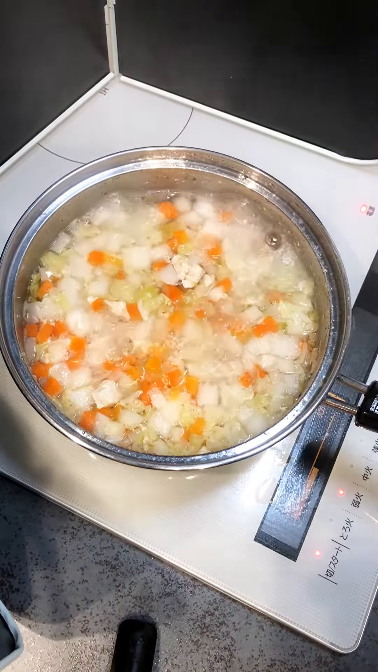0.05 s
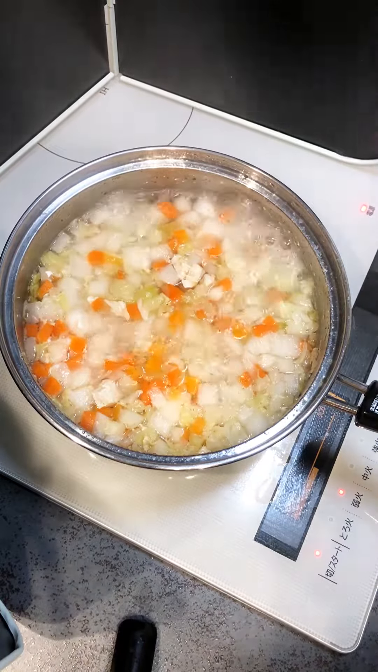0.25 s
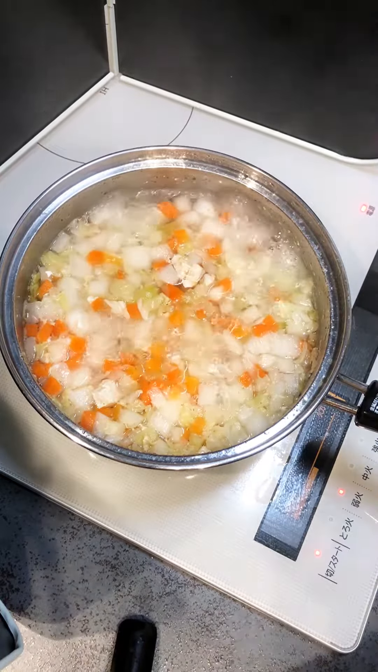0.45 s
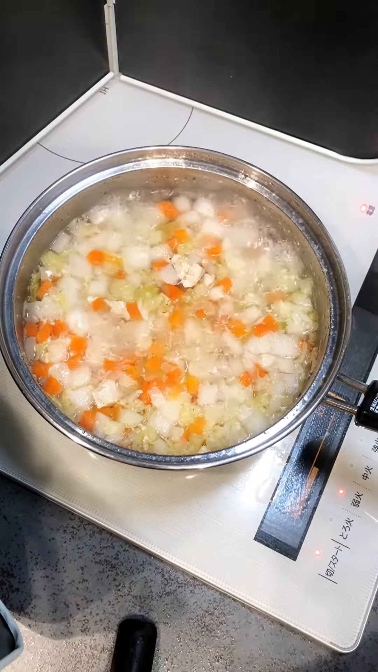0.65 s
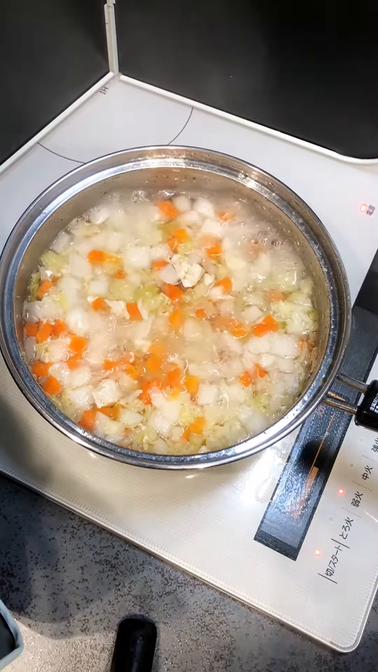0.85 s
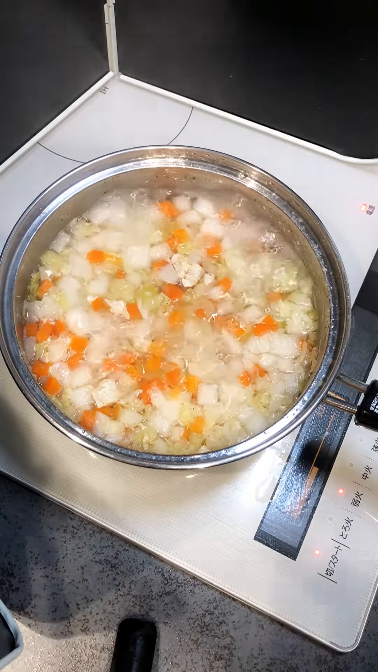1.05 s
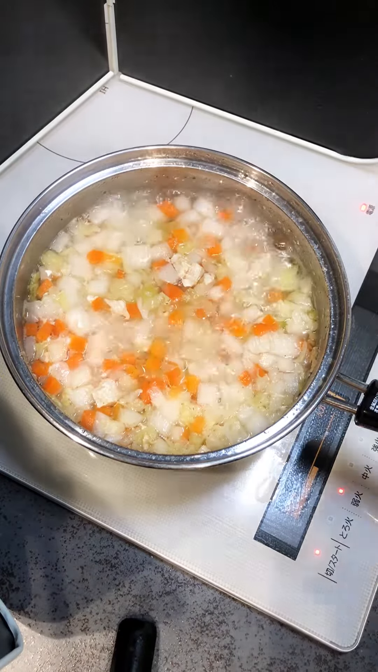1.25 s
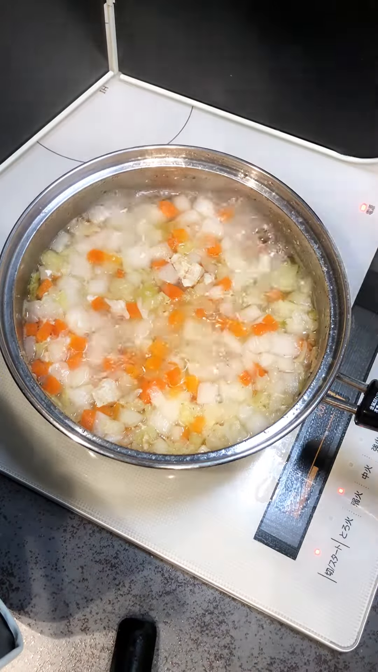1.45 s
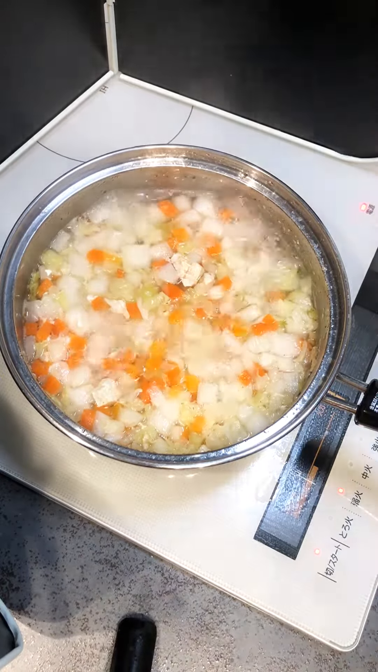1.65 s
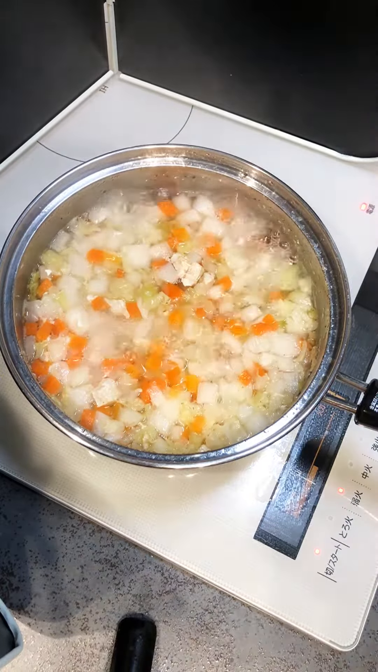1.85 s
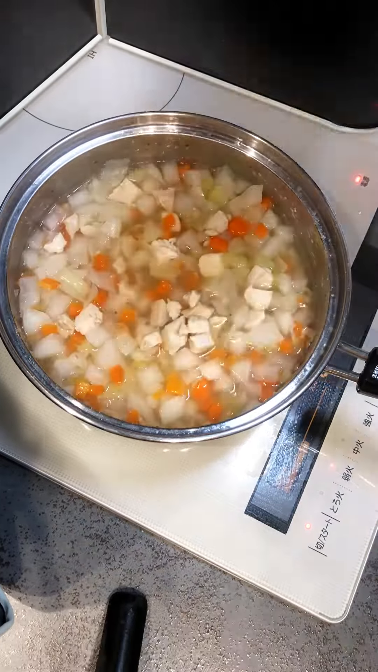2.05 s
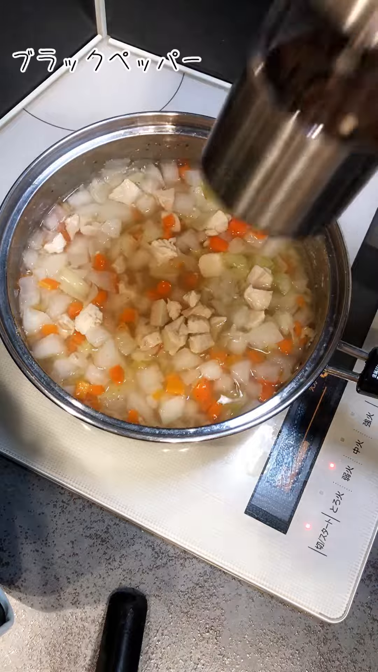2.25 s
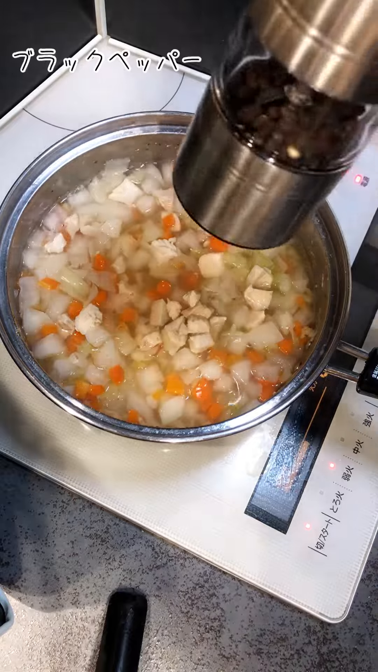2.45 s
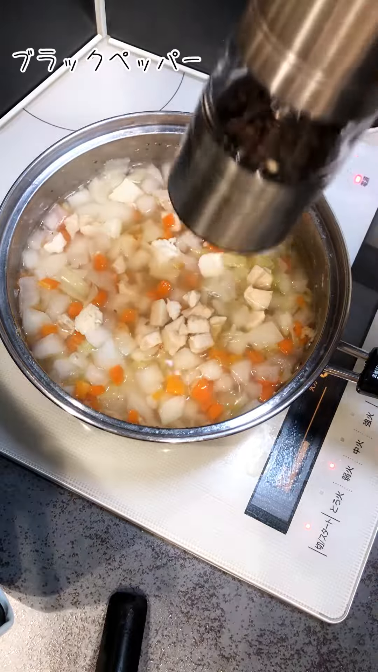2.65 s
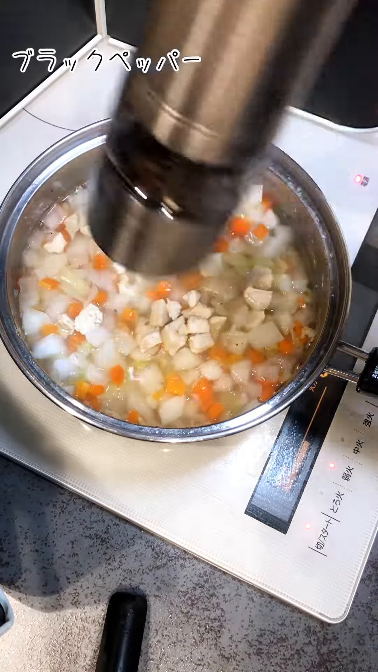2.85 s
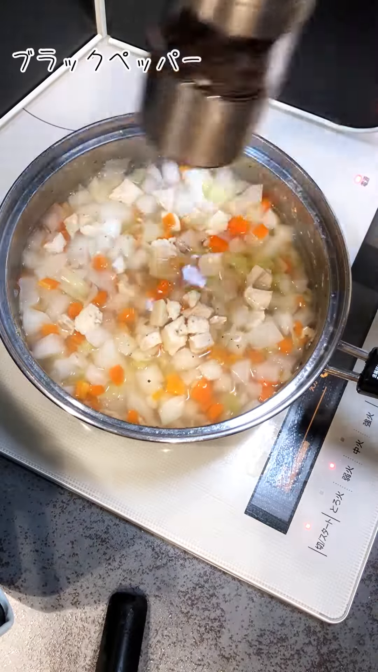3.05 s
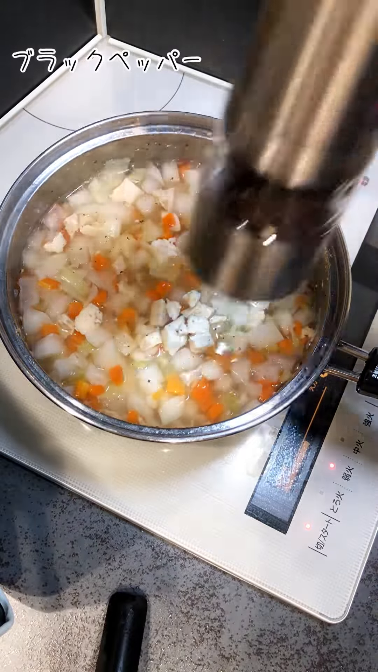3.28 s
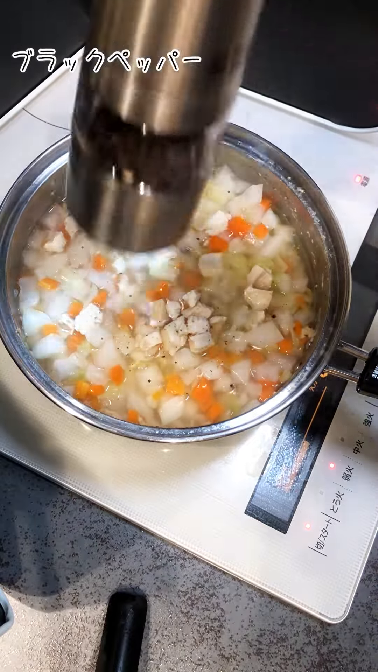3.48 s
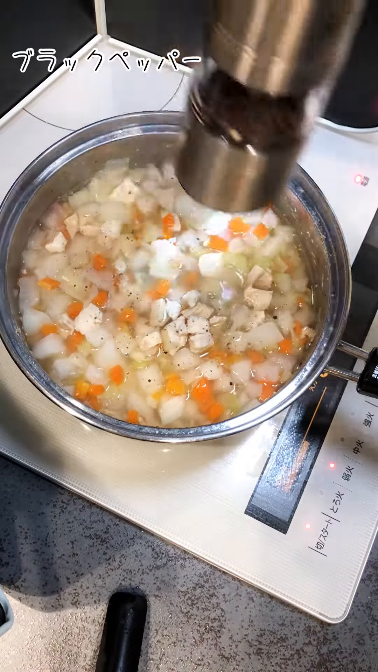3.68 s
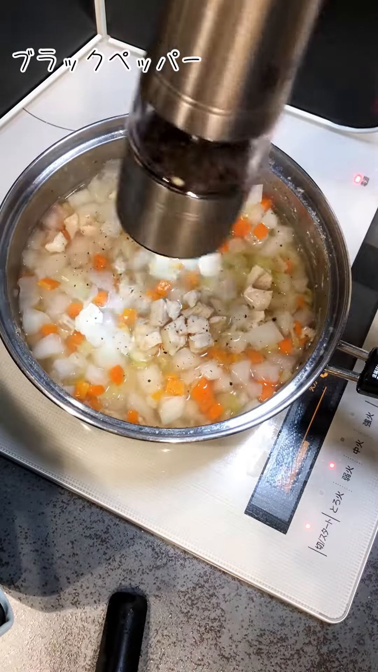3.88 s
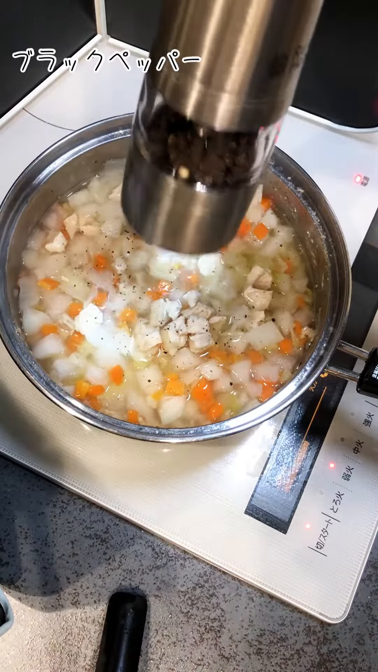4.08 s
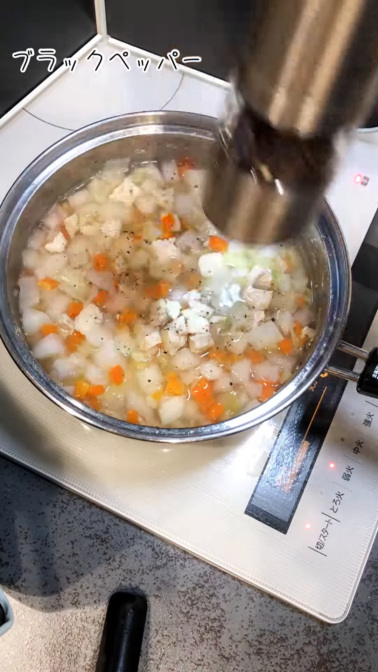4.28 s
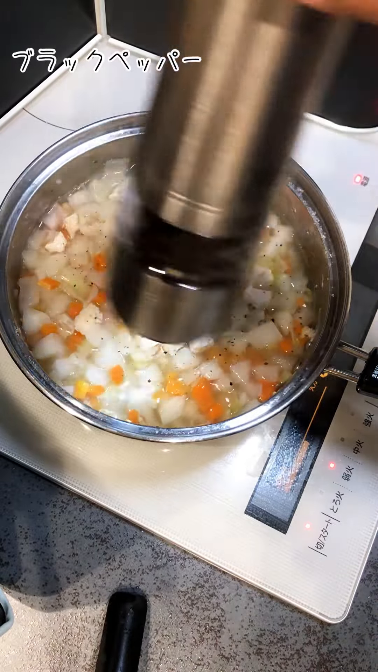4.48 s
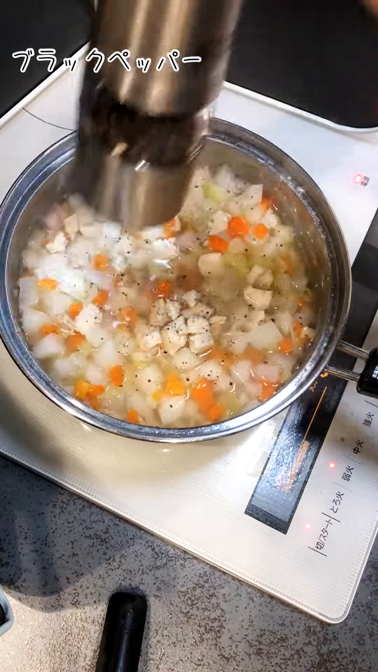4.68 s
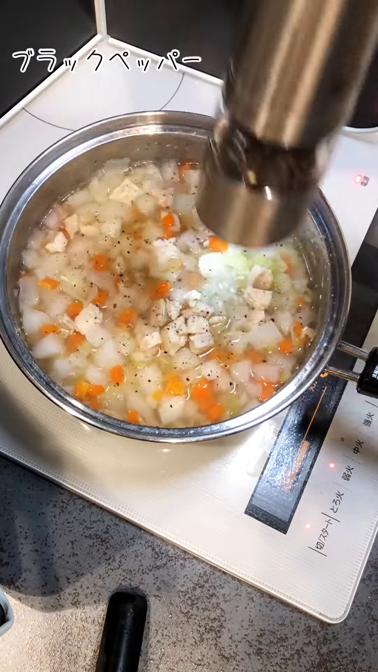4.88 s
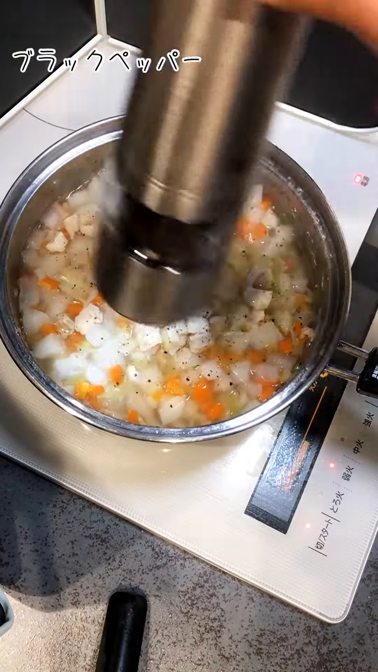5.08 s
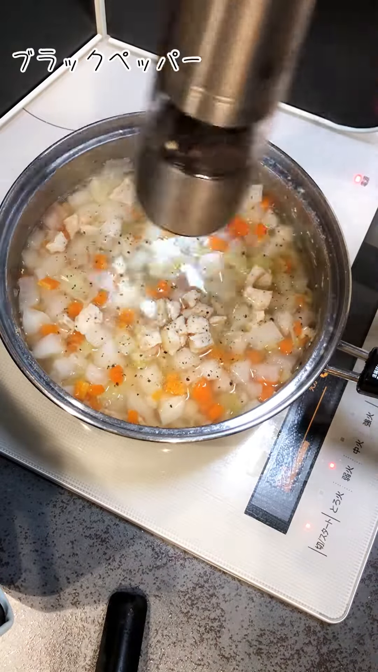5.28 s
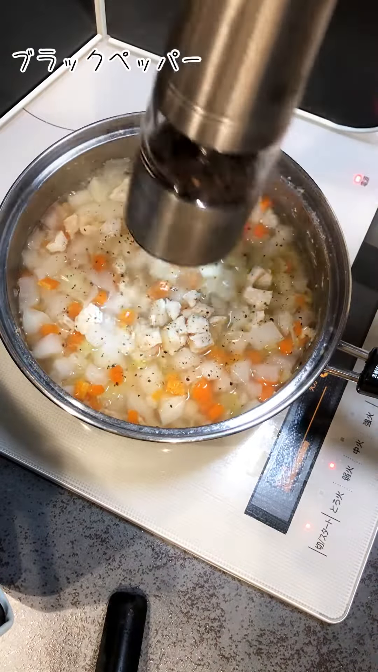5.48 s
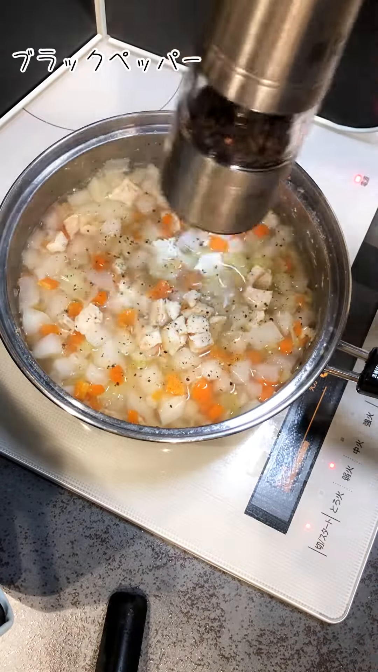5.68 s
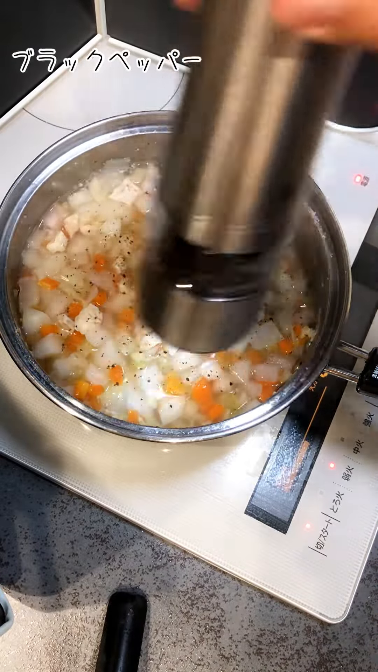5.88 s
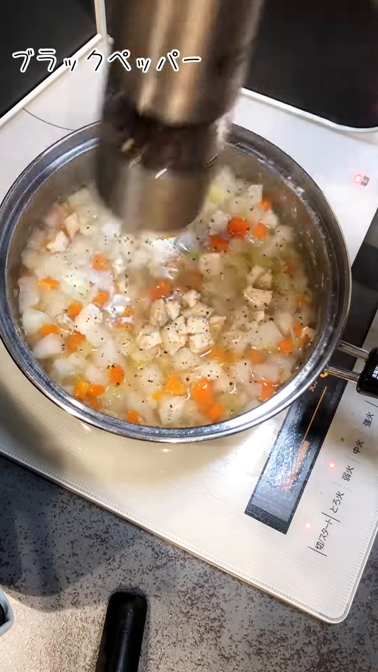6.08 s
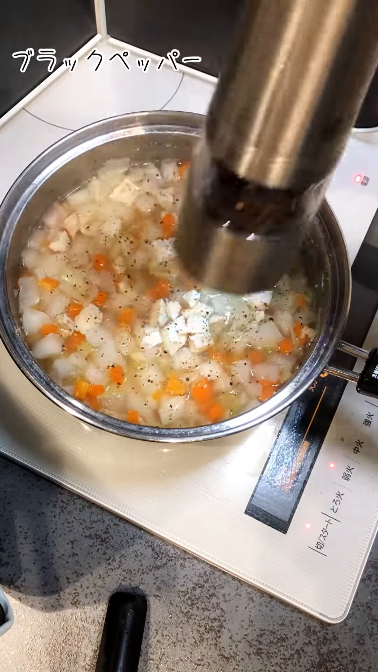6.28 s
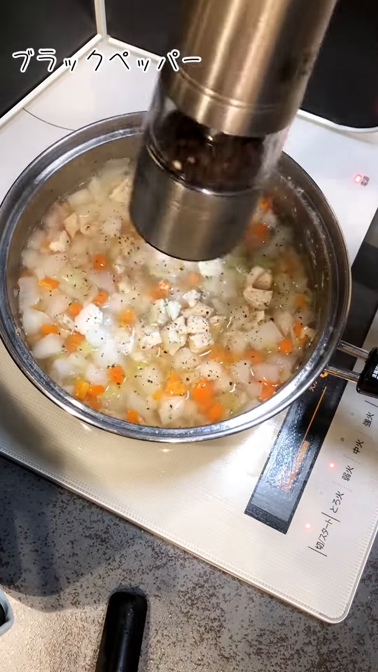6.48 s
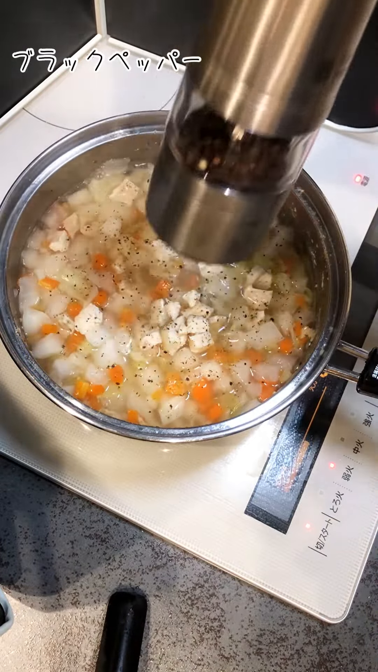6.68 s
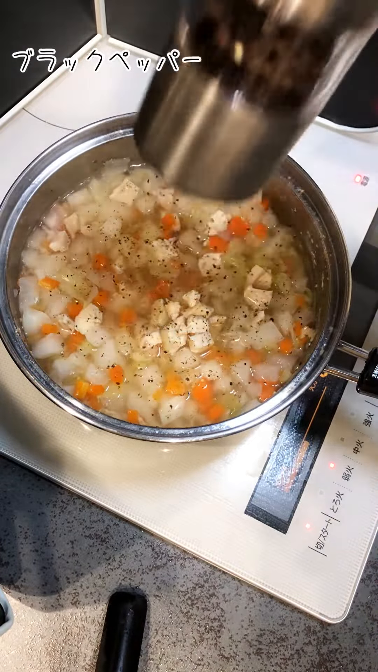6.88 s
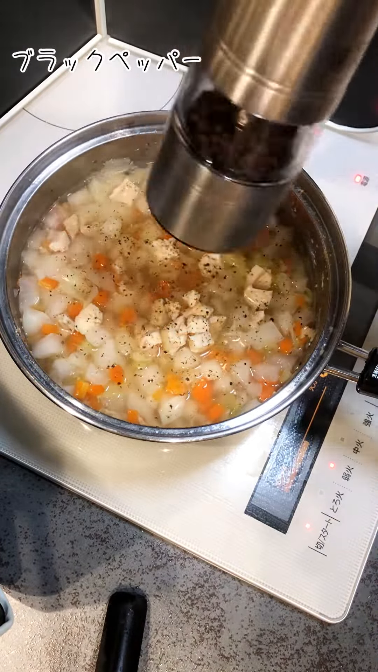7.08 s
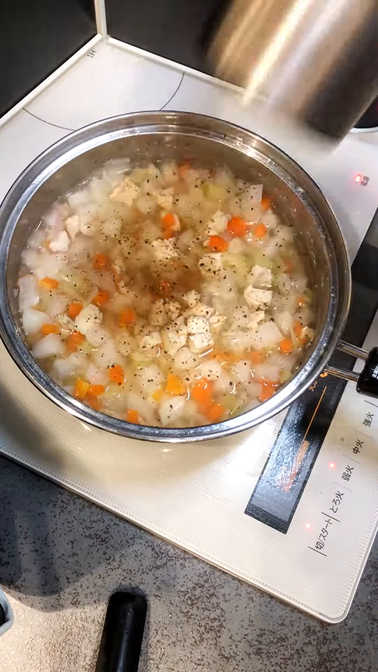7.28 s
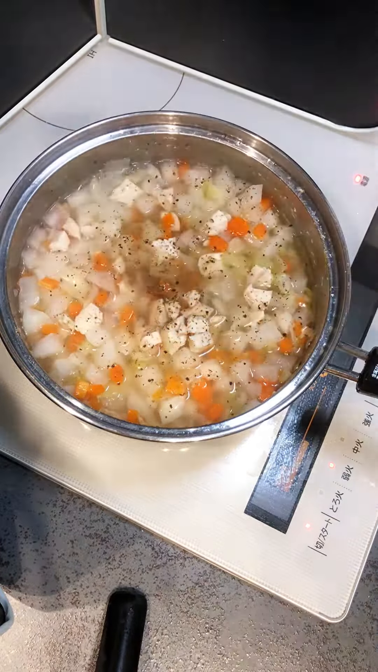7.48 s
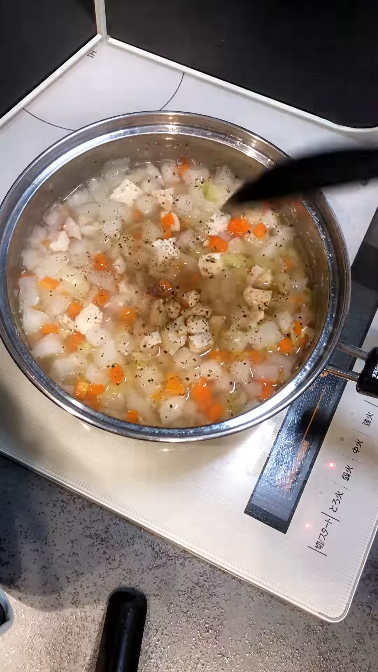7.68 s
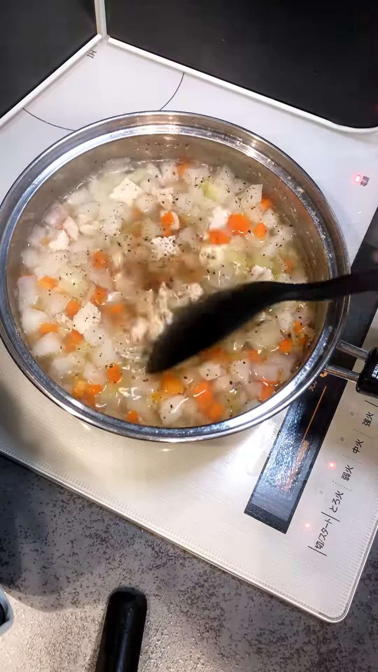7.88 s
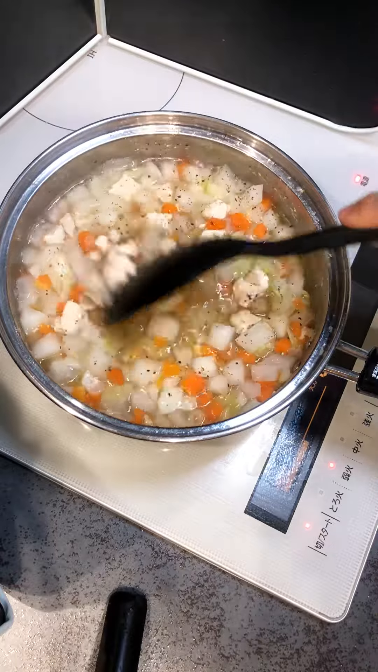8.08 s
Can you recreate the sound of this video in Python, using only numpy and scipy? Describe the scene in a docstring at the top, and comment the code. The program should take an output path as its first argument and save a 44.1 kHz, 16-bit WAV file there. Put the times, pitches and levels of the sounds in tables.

```python
"""Small kitchen, one close microphone: an electric pepper mill grinds for four seconds over a simmering soup.
The hob hums: fan air as coloured noise, plus wavering tones. The soup fizzes and pops in short noisy cycles.
A utensil is set down on the counter beforehand, as struck modes.
The mill's gears whine and rattle on one speed that sags as the burr bites; peppercorns crunch as dense
coloured clicks, and slide back when the mill is lifted."""
import sys
import numpy as np
from scipy import signal
from scipy.fft import rfft, irfft
from scipy.io import wavfile
from scipy.ndimage import uniform_filter1d

SR = 44100
rng = np.random.default_rng(int(sys.argv[2]) if len(sys.argv) > 2 else 0)


def bounce(signal):
    """Save signal as a 16-bit WAV file at the path given by the first command-line argument."""
    frames = np.transpose(np.atleast_2d(signal))
    limited = np.clip(frames, -1, 1)
    pcm = np.round(limited * 32767).astype(np.int16)
    wavfile.write(sys.argv[1], SR, pcm)


N = 358974
TIME = np.arange(N) / SR  # s


def amp(db):
    """Decibels to amplitude."""
    return 10 ** (np.asarray(db) / 20)


def evened(x):
    """Scales to rms 1."""
    return x / np.sqrt(np.mean(x ** 2) + 1e-20)


def read(points, hz):
    """Curve value at a frequency, interpolated over log frequency."""
    point_hz, value = np.transpose(points)
    return np.interp(np.log(hz + 1), np.log(point_hz + 1), value)


def follow(table, axis):
    """One column of a time curve, sample by sample."""
    rows = np.array(table, float)
    return np.interp(TIME, rows[:, 0], rows[:, axis])


def during(table, fade_s=0.01):
    """1 while a time curve lasts, with short fades."""
    fade_in = np.clip((TIME - table[0][0]) / fade_s, 0, 1)
    fade_out = np.clip((table[-1][0] - TIME) / fade_s, 0, 1)
    return fade_in * fade_out


def add(mix, start_s, sound):
    """Adds a sound in place, cut at the end of the mix."""
    part = mix[round(start_s * SR):][:len(sound)]
    part += sound[:len(part)]


def drift(rate_hz):
    """Random wander of rms 1: noise low-passed near rate_hz."""
    hz = np.fft.rfftfreq(N, 1 / SR)
    return evened(irfft(rfft(rng.standard_normal(N)) / (1 + (hz / rate_hz) ** 4), N))


def lag(x, settle_s):
    """Follows x with first-order inertia."""
    keep = np.exp(-1 / (settle_s * SR))
    return signal.lfilter([1 - keep], [1, -keep], x)


def colour(x, spectrum, rings=(), size=4096):
    """Minimum-phase filter: a smooth spectrum with resonances (hz, width_hz, height_db) on top; rms 1."""
    hz = abs(np.fft.fftfreq(size, 1 / SR))
    ring_db = sum(height_db / (1 + (2 * (hz - ring_hz) / width_hz) ** 2) for ring_hz, width_hz, height_db in rings)
    log_gain = np.log(amp(read(spectrum, hz) + ring_db))
    taps = np.fft.ifft(np.exp(np.conj(signal.hilbert(log_gain)))).real
    return evened(signal.oaconvolve(x, taps)[:N])


def grains(per_s, spread_db):
    """Random clicks, a few much larger than the rest (smaller if spread_db is negative)."""
    size = amp(spread_db * np.minimum(rng.exponential(1, N), 5))
    sign = rng.choice([-1, 1], N)
    return size * sign * (rng.random(N) < per_s / SR)


def strikes(blows, modes, tick_db, size=13000):
    """Each blow rings the same modes, some more than others according to where it lands."""
    out, t_s = np.zeros(N), np.arange(size) / SR
    hz, mode_db, t60_s = np.array(modes, float).T[:, :, None]
    for start_s, blow_db, favoured_hz, lift_db in blows:
        octaves_off = np.log2(hz / favoured_hz)
        share = amp(mode_db + lift_db * np.exp(-(2 * octaves_off) ** 2))
        tones = np.sin(2 * np.pi * (hz * t_s + rng.random(hz.shape)))
        ring = share / np.linalg.norm(share) * amp(-60 * t_s / t60_s) * tones
        tick = signal.lfilter([1], [1, -.6], rng.standard_normal(size)) * np.exp(-t_s / 0.0014)
        attack = 1 - np.exp(-t_s / 0.000073)
        add(out, start_s, amp(blow_db) * (ring.sum(0) + amp(tick_db) * tick) * attack)
    return out


# Hob fan spectrum: hz, relative_db_per_hz
AIR_COLOUR = [(15, -29), (25, -4.5), (59, -5.5), (129, -1), (164, -5.5), (204, -3.5), (221, -7),
              (274, -4.5), (445, -10.5), (482, -7), (782, -14), (871, -9), (1750, -14), (3930, -27.5),
              (15500, -39.5)]


def fan_air():
    """Wash of moving air: coloured noise, wavering slightly."""
    rings = [(878, 47, 5.0), (382, 120, -3), (60, 17, -10), (22, 16, -9)]  # hz, width_hz, height_db
    level_db = -49.9 + 0.35 * drift(rate_hz=8.6)
    return colour(rng.standard_normal(N), AIR_COLOUR, rings) * amp(level_db)


# Hob fan steady tones: hz, rms_db
FAN_TONES = [(123.8, -62.5), (199.2, -61), (527.6, -87), (904.4, -69.5), (1701, -68.5), (14745, -79)]


def fan_hum():
    """Steady fan tones, each wavering in level and phase."""
    tones = sum(amp(rms_db + 2.0 * drift(rate_hz=4.1))
                * np.sin(2 * np.pi * hz * TIME + 0.49 * drift(rate_hz=5.1)) for hz, rms_db in FAN_TONES)
    return np.sqrt(2) * tones


# Low rumble that starts abruptly and sinks unevenly: time_s, level_db
RUMBLE_LEVEL = [(1.85, -48), (1.97, -54), (2.15, -52.5), (2.45, -55), (2.62, -58)]
# Its spectrum: hz, relative_db_per_hz
RUMBLE_SPECTRUM = [(20, -23), (44, -7), (65, -14), (150, -9.5), (270, -9), (450, -19), (1500, -42.5)]


def rumble():
    """A short low rumble, abrupt then sinking unevenly: coloured noise under a level curve."""
    noise = colour(rng.standard_normal(N), RUMBLE_SPECTRUM)
    return noise * amp(follow(RUMBLE_LEVEL, axis=1)) * during(RUMBLE_LEVEL)


def hob():
    """The cooling fan's air and tones, with the short rumble."""
    return fan_air() + rumble() + fan_hum()


# Dense reflections of the kitchen: hz, t60_s
KITCHEN_DECAY = [(200, 1), (1000, 0.56), (4000, 0.41), (12000, 0.45)]


def kitchen(x, size=22050):
    """Dense reflections from 4 ms on, each band dying at its own speed."""
    reflections = rng.standard_normal(size) * (rng.random(size) < .12)
    reflections = reflections * (np.arange(size) > .004 * SR)
    hz, t_s, bands = signal.stft(reflections, SR, nperseg=256)
    decay = amp(-60 * t_s / read(KITCHEN_DECAY, hz)[:, None])
    tail = signal.istft(bands * decay, SR, nperseg=256)[1]
    return signal.oaconvolve(x, tail / np.linalg.norm(tail))[:N]


def bubble(hz, size=600):
    """A bursting film: a few noisy cycles around one pitch; big, low bubbles last longer."""
    cycles = hz * np.arange(size) / SR
    film = rng.standard_normal(size) + 1j * rng.standard_normal(size)
    pole = np.exp(-.45 * np.pi * hz / SR)
    film = signal.lfilter([1], np.poly([pole, pole]), film)
    pop = (film * np.exp(2j * np.pi * cycles)).real * np.exp(-cycles / 13)
    return pop / abs(pop).max()


POPS_PER_S, POP_PEAK_DB, POP_SPREAD_DB = 1.7, -43, 6
POP_LOW_HZ, POP_HIGH_HZ = 6000, 14300


def chance_pops(count=40):
    """Bubbles of chance size bursting at chance intervals: start_s, peak_db, centre_hz."""
    start_s = np.cumsum(rng.exponential(1, count)) / POPS_PER_S
    peak_db = POP_PEAK_DB + POP_SPREAD_DB * rng.standard_normal(count)
    return list(zip(start_s, peak_db, rng.uniform(POP_LOW_HZ, POP_HIGH_HZ, count)))


# Fizz of small bubbles: time_s, rms_db
FIZZ_LEVEL = [(1.9, -72), (1.97, -63.5), (7.2, -62), (8.14, -60.5)]
# Bubbles bursting at set times: start_s, peak_db, centre_hz
SET_POPS = [(0.075, -37, 10900), (0.1334, -39, 9050), (0.9028, -41, 10400), (1.1503, -36, 13100),
            (1.2281, -40, 13000), (2.158, -42, 4480), (2.465, -41, 2480), (7.0803, -31, 9400),
            (7.1573, -38.5, 7100), (7.399, -39, 9600), (7.398, -41, 5030), (7.399, -41, 2000),
            (7.4655, -41.5, 2780), (7.5546, -42, 5460), (7.8096, -38, 14600), (7.9099, -41.5, 4470)]


def simmer(count=24, tilt_db_per_octave=3.5):
    """Pops at set and chance times over the fizz of bubbles of many sizes; the smallest sparkle most."""
    sizes_hz = np.linspace(4000, 15600, count)
    fizz = sum(amp(tilt_db_per_octave * np.log2(hz))
               * signal.oaconvolve(grains(per_s=18, spread_db=5.5), bubble(hz))[:N] for hz in sizes_hz)
    out = evened(fizz) * amp(follow(FIZZ_LEVEL, axis=1))
    for start_s, peak_db, hz in SET_POPS + chance_pops():
        add(out, start_s, amp(peak_db) * bubble(hz))
    return out


# Utensil set down, rocking to rest: start_s, level_db, favoured_hz (by point of contact), lift_db
UTENSIL_KNOCKS = [(0.6273, -13.5, 2650, 17), (0.629, -14.5, 845, 16), (0.695, -27, 615, 20),
                  (0.716, -35, 620, 6), (0.726, -31, 5200, 10), (0.7275, -26.5, 610, 23),
                  (0.7505, -25.5, 4580, 8), (0.761, -28.5, 4400, 5), (0.868, -38.5, 6000, 6)]
# Utensil modes: hz, relative_db, t60_s
UTENSIL_MODES = [(223, -14, 0.4), (315, -8, 0.071), (633, -8, 0.08), (856, 2, 0.033), (917, 0.5, 0.034),
                 (1065, -2, 0.032), (1390, -2, 0.037), (1740, 0.5, 0.053), (1850, 0, 0.018),
                 (2550, -10, 0.034), (2680, -5.5, 0.0063), (3700, -14, 0.024), (4160, -9.5, 0.045),
                 (4870, -10, 0.026), (5500, -11, 0.027), (6500, -18, 0.038), (6560, -16, 0.04),
                 (7360, -16, 0.037), (8360, -20, 0.043), (10600, -26, .04)]


def utensil():
    """A utensil set down on the counter: each contact strikes its modes."""
    return strikes(UTENSIL_KNOCKS, UTENSIL_MODES, tick_db=-24)


# Sliding rushes: peak_s, length_s, level_db
CORN_SLIDES = [(6.938, 0.061, -30), (6.997, 0.026, -45), (7.047, 0.089, -49.5)]
# Sliding corns' spectrum: hz, relative_db_per_hz
SLIDE_SPECTRUM = [(1000, -17), (2400, -17), (2900, -6.5), (4200, -12), (5300, -6), (6050, 4), (6800, -7),
                  (7600, 1), (8600, -6), (9600, -0.5), (12500, -9), (15600, -6)]


def slide():
    """Loose corns rush along the lifted hopper: dense clicks; each rush swells and dies away."""
    level = sum(amp(level_db) * np.exp(-(2 * (TIME - peak_s) / length_s) ** 2)
                for peak_s, length_s, level_db in CORN_SLIDES)
    return colour(grains(per_s=4600, spread_db=3.0), SLIDE_SPECTRUM) * level


# Snaps from button, motor kick and whole corns breaking: start_s, level_db, favoured_hz, lift_db
BODY_SNAPS = [(1.945, -28.5, 1450, 5), (1.951, -30.5, 1500, 5), (2.582, -31, 1450, 0),
              (2.586, -46, 1300, 6.5), (2.625, -31, 2500, 10), (2.944, -19, 2900, 34),
              (2.955, -17, 2200, 12), (2.958, -16, 600, 11), (4.405, -18, 3794, 31),
              (4.407, -19.5, 396.5, 13.5), (5.267, -20, 2003, 13), (6.0125, -11.5, 3485, 25),
              (6.738, -17, 2044, 15)]
# Mill body modes: hz, relative_db, t60_s
BODY_MODES = [(380, -13.5, .025), (487, -8.5, 0.038), (951, 4.5, 0.067), (1320, -2, 0.027),
              (1730, 12, 0.01), (2080, -17, .018), (2840, -0.5, 0.011), (4000, -16, .006)]


def snaps():
    """Sharp blows ring the modes of the mill's body."""
    return strikes(BODY_SNAPS, BODY_MODES, tick_db=-39)


def patchy(x, depth_db):
    """Each corn cracks with a colour of its own: patches some 500 Hz wide and 50 ms long."""
    bands = signal.stft(x, nperseg=512, noverlap=384)[2]
    patches = uniform_filter1d(rng.standard_normal(bands.shape), size=6, axis=0)
    patches = evened(uniform_filter1d(patches, size=17, axis=1))
    return evened(signal.istft(bands * amp(depth_db * patches), nperseg=512, noverlap=384)[1][:N])


# Levels between bites at full speed; share of the extra crunch that the rattle gets (0-1)
RATTLE_DB, CRUNCH_DB, RATTLE_SHARE = -28, -26, 0.43
RATTLE_POWER, CRUNCH_POWER = 0.84, 0.94  # exponents of speed
# Rattling housing spectrum: hz, relative_db_per_hz
HOUSING_COLOUR = [(100, -45), (380, -18.5), (600, -12), (900, -3), (1200, -2.5), (1550, -5.5), (2000, 1.5),
                  (2350, 1), (2900, 0.5), (3400, -6.5), (4500, -11.5), (8000, -32.5)]
# Cracking pepper spectrum: hz, relative_db_per_hz
CRUNCH_COLOUR = [(500, -21.5), (2000, 1.5), (3800, -2.5), (5200, 2), (6900, -1.5), (8200, 0.5),
                 (10000, 1.5), (11000, -0.5), (13700, 1), (15600, 5.5)]
# Steel burr rings: hz, width_hz, height_db (above the crunch)
BURR_RINGS = [(3774, 130, 9.5), (4450, 300, 4.5), (6400, 390, 3.5), (7760, 440, 5), (8820, 350, 4.5),
              (9870, 400, 2), (12620, 200, 1.5), (12500, 250, 5), (15400, 500, -3.5), (15000, 380, 4.5)]


def grinding(speed, extra_db):
    """The housing rattles under load while the burr cracks corns into thousands of bits a second."""
    jolt = drift(rate_hz=40)  # shared by rattle and crunch
    rattle = patchy(colour(grains(per_s=4000, spread_db=-1.5), HOUSING_COLOUR), depth_db=0.7)
    crunch = patchy(colour(grains(per_s=11000, spread_db=2.0), CRUNCH_COLOUR, BURR_RINGS), depth_db=1.82)
    rattle_db = RATTLE_DB + RATTLE_SHARE * extra_db + 1.0 * jolt
    crunch_db = CRUNCH_DB + extra_db + 0.76 * jolt + 0.73 * drift(rate_hz=88)
    rattle = rattle * amp(rattle_db) * speed ** RATTLE_POWER
    return rattle + crunch * amp(crunch_db) * speed ** CRUNCH_POWER


def harmonic(angle, order, clean, scatter_hz):
    """Backlash scatters the phase of a tooth harmonic into a fuzzy band just above it."""
    clean = np.clip(clean, 0, 1)
    fuzz_angle = 1.02 * order * angle
    fuzz = drift(scatter_hz) * np.cos(fuzz_angle) + drift(scatter_hz) * np.sin(fuzz_angle)
    tone = np.sqrt(2 * clean) * np.cos(order * angle) + np.sqrt(1 - clean) * evened(fuzz)
    return tone * amp(1.34 * drift(rate_hz=48))


FREE_HZ, TEETH = 1559, 6.74  # tooth rate with an empty burr; tooth meetings per motor turn
FLUTTER, FLUTTER_LOAD = 0.00492, 0.01507  # rms share of speed when free, added share at stall
UPPER_LOAD_DB, WHINE_POWER = 9.5, 1.16  # upper harmonics' growth at stall; exponent of speed
# Motor tones, shaft and three rotor poles: multiples of shaft speed
SHAFT_ORDERS = (1, 3)
# Upper harmonics: multiples of tooth rate
TOOTH_ORDERS = (3, 4)
# Motor tones sweeping past housing resonances, before scaling by speed: hz, rms_db
MOTOR_LEVEL = [(100, -86), (170, -57), (210, -57), (350, -57), (480, -55.5), (560, -44), (650, -42.5),
               (720, -51)]
# Upper tooth harmonics likewise, before load and speed: hz, rms_db
UPPER_LEVEL = [(2200, -46), (2900, -30.5), (3350, -37), (3700, -40.5), (4400, -43), (4900, -49.5),
               (6200, -65)]
# Slow teeth stay in contact, fast ones bounce: tooth_rate_hz, clean_share (0-1)
CONTACT = [(1050, 0.63), (1300, .25)]
# Whine at full speed as the mill is swung over the pot: time_s, rms_db
WHINE_LEVEL = [(2.7, -34), (3.38, -33), (3.6, -33.5), (3.7, -38), (3.8, -34.5), (3.98, -33), (4.11, -50),
               (4.22, -34), (4.7, -29.5), (5.2, -30.5), (5.6, -28.5), (5.68, -33.5), (5.83, -26.5),
               (6.03, -29), (6.13, -41.5), (6.26, -27.5), (6.48, -39.5), (6.71, -29)]
# Housing's gain for gear chatter, strong low, weaker near 2000 Hz, second peak near 2900 Hz: hz, gain_db
CHATTER_GAIN = [(1400, 0), (2000, -4), (2400, -2.5), (2950, -0.5), (3150, -6)]


def gears(speed, load, chatter):
    """Motor and gear tones on one sagging speed; loose teeth chatter around the harmonics."""
    flutter = (FLUTTER + FLUTTER_LOAD * load) * drift(rate_hz=29.47)
    tooth_hz = FREE_HZ * speed * (1 + flutter)
    angle = 2 * np.pi * np.cumsum(tooth_hz) / SR
    motor = sum(amp(read(MOTOR_LEVEL, k * tooth_hz / TEETH) + 2.0 * drift(rate_hz=15))
                * np.cos(k * angle / TEETH) for k in SHAFT_ORDERS)

    # pure at full speed, ragged when the gears labour
    purity = np.interp(tooth_hz, [850, 1380], [.45, .9])
    whine_level = amp(follow(WHINE_LEVEL, axis=1)) * speed ** WHINE_POWER
    whine = whine_level * harmonic(angle, order=1, clean=purity, scatter_hz=121)

    contact = read(CONTACT, tooth_hz)
    second_level = chatter * amp(read(CHATTER_GAIN, 2 * tooth_hz)) * np.minimum(2 * speed, 1)
    second = second_level * harmonic(angle, order=2, clean=contact, scatter_hz=141)
    upper = sum(amp(read(UPPER_LEVEL, k * tooth_hz) + UPPER_LOAD_DB * load)
                * harmonic(angle, order=k, clean=contact, scatter_hz=139) for k in TOOTH_ORDERS)
    return speed * (np.sqrt(2) * motor + upper) + whine + second


GRIP_S = 0.03  # a corn is gripped, and later let go, within this
# Burr bites a peppercorn: start_s, length_s (to release), load (share of stall 0-1), chatter_db, extra_crunch_db
CORN_BITES = [(2.673, 0.061, 0.28, -31, 3), (2.738, .158, 0.28, -37, 3), (2.897, .04, 0.62, -32, 5),
              (2.937, .169, .23, -37, 2.5), (3.105, 0.23, 0.26, -32, 3), (3.471, .12, 0.2, -27.5, 3.5),
              (3.721, .087, 0.11, -37, 0.5), (3.837, 0.081, 0.15, -30.5, 2.5), (3.947, 0.046, 0.1, -32, 3),
              (4.166, .11, 0.13, -30.5, 1), (4.317, 0.069, 0.16, -28, 4.5), (4.495, .061, 0.07, -31.5, 2),
              (4.59, .13, .38, -25, 4.5), (4.86, .14, .205, -32, 4), (5.123, .14, .1, -37, 2.5),
              (5.279, 0.32, 0.11, -31, 2.3), (5.593, .1, .38, -32, 3.5), (5.732, 0.18, .14, -52, 3),
              (5.908, .11, 0.34, -25.5, 5), (6.024, .19, 0.19, -38, 2.5), (6.223, 0.069, 0.17, -40, 5),
              (6.289, .12, 0.22, -28, 5), (6.483, 0.082, .05, -40, 1), (6.62, 0.039, .02, -42, 1.5)]


def biting(heights):
    """Each bite grips, holds and lets go; heights gives the height of each."""
    out = 0
    for (start_s, length_s, *_), height in zip(CORN_BITES, heights):
        grip = np.clip((TIME - start_s) / GRIP_S, 0, 1)
        release = np.clip((start_s + length_s - TIME) / GRIP_S + 1, 0, 1)
        out = out + height * grip * release
    return out


ON_S, OFF_S, COAST_S = 2.612, 6.674, 0.2  # button pressed, let go; even coast to rest
INERTIA_S, SETTLE_S = 0.094, 0.023  # lag of speed behind load; lag of crunch behind load
CHATTER_DB = -41.5  # between bites, before the housing's gain
UNLOAD_DB = -6.5  # tones fade as teeth unload, by the end of the coast


def mill():
    """Bites load the motor; load and speed (1 = running free) drive the gears and the grinding."""
    _, _, loads, chatter_db, extra_db = np.transpose(CORN_BITES)
    load = biting(loads)
    coasted = np.clip((TIME - OFF_S) / COAST_S, 0, 1)
    driven = (TIME > ON_S) * np.clip(1 - load, 0, 1)
    speed = lag(driven, INERTIA_S) * (1 - coasted)
    chatter = amp(CHATTER_DB) + biting(amp(chatter_db))
    tones = gears(speed, load, chatter) * amp(UNLOAD_DB * coasted)
    return tones + grinding(speed, lag(biting(extra_db), SETTLE_S))


def scene():
    """Mill and pot are close; the counter is a little further off. Both channels hear the same."""
    near = mill() + slide() + simmer() + snaps()
    counter = utensil()
    reflected = kitchen(amp(-11) * near + amp(-8) * counter)
    mono = near + counter + reflected + hob()
    return np.array([mono, mono])


EDGE_HZ = 15830
# Brief level dips: centre_s, length_s, depth_db
LEVEL_DIPS = [(1.936, 0.01, -14), (7.315, 0.0098, -14)]


def record(dry):
    """Two brief dips in level, then the band limit."""
    dip_db = sum(depth_db * np.exp(-(2 * (TIME - centre_s) / length_s) ** 4)
                 for centre_s, length_s, depth_db in LEVEL_DIPS)
    low_pass = signal.firwin(511, EDGE_HZ, window=("kaiser", 9), fs=SR)
    return signal.oaconvolve(dry * amp(dip_db), low_pass[None], "same")


dry = scene()
out = record(dry)
bounce(out)
```